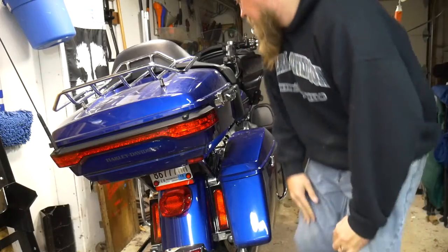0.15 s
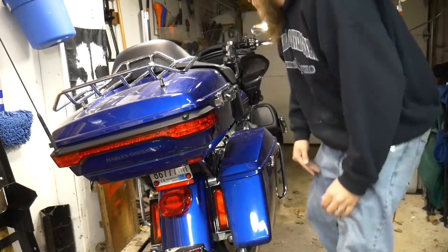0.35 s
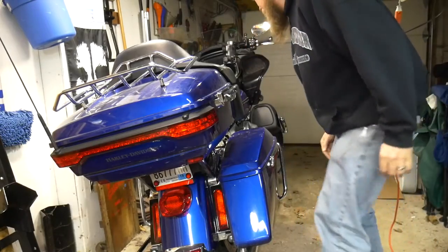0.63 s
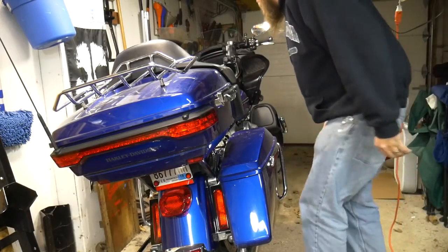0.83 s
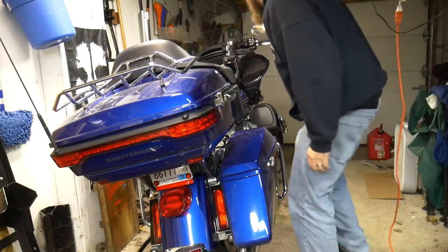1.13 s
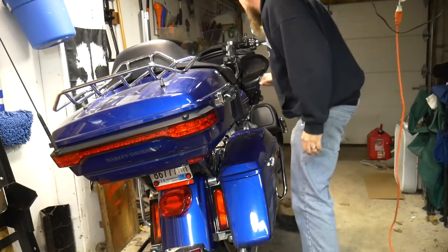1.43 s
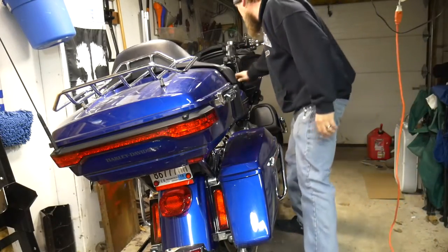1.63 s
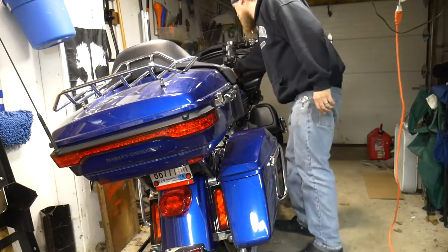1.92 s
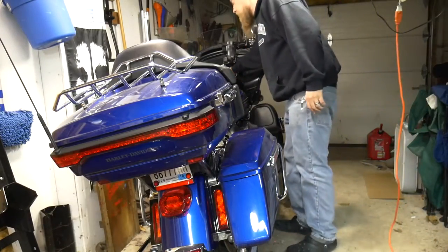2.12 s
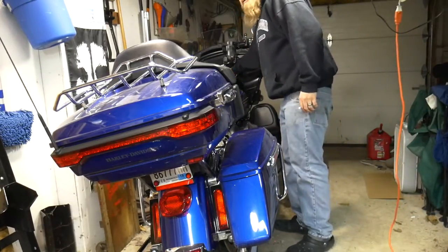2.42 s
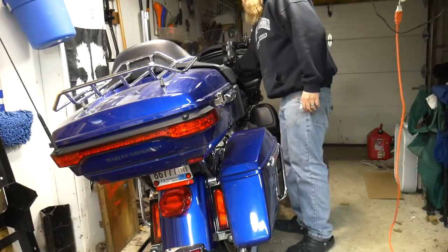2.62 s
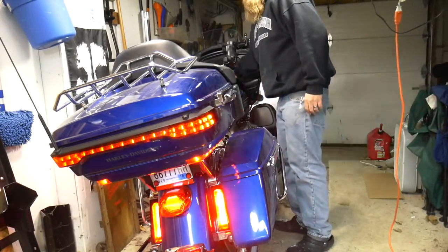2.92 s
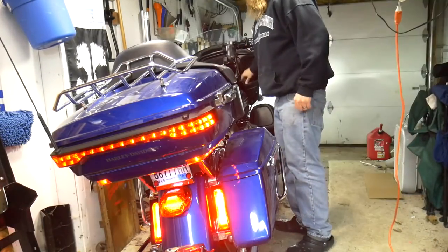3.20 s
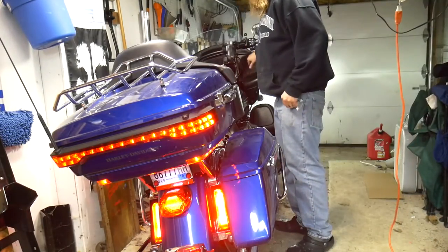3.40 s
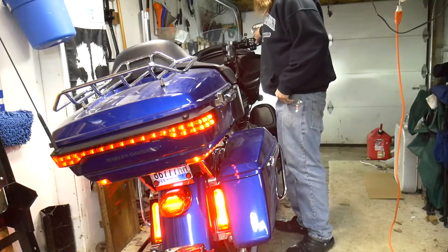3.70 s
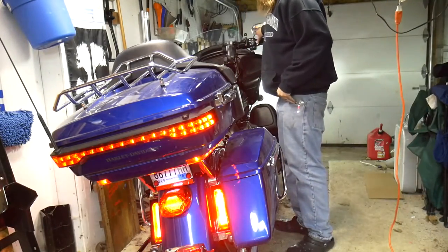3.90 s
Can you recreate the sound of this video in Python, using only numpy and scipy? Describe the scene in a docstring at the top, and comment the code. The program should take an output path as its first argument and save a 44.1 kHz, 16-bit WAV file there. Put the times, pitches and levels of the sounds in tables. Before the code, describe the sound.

After soft shoe scuffs, a sharp switch click and a clack set off a motorcycle fuel pump's electric whine.

```python
"""In a humming garage, a man shuffles up to a motorcycle, his soles grinding grit and his clothes rubbing.
He turns the ignition switch: it snaps sharply and its housing rings. A relay (an electric switch) ticks,
an actuator (a small powered lever) clacks against its stop, and the electric fuel pump fills the line.
Its motor makes a thin, fluttering whine over a low purr, while the fuel hisses past."""
import sys
import numpy as np
from scipy import signal
from scipy.fft import rfft, irfft
from scipy.io import wavfile

SR = 44100
rng = np.random.default_rng(int(sys.argv[2]) if len(sys.argv) > 2 else 0)


def to_wav(sig):
    """Store sig (one row per channel, or 1-D mono) as 16-bit WAV at the path in sys.argv[1].

    Samples outside -1..1 are clipped; the rate is SR.
    """
    pcm = np.clip(np.atleast_2d(sig), -1, 1) * 32767
    pcm = np.round(pcm).astype(np.int16)
    wavfile.write(sys.argv[1], SR, pcm.T)  # frames by channels


N = 178635
TIME = np.arange(N) / SR
PUMP_START_S = 2.97

# tone colour of a small hard tap: f/Hz, level/dB
TICK_SPECTRUM = [(300, -13), (1200, 5.5), (4000, 4), (9000, -8), (15500, -9)]


def ignition_switch(echo_db=7):
    """The switch snaps over its notch in four quick hits, and the parts around it ring."""
    # the hits: t/s, level/dB, time to fade by 60 dB/s
    hits = [(2.6082, -19, .03), (2.6101, -12, 0.028), (2.6118, -13, 0.027), (2.6134, -9.5, 0.018)]
    # tone colour of the snap: f/Hz, level/dB
    spectrum = [(88, -47), (150, -38), (254, -42), (391, -18.5), (466, -25), (600, -22.5), (805, -16.5),
                (905, -14.5), (1040, -11), (1630, -11.5), (1900, -13), (3550, -15), (4950, -19),
                (5360, -18.5), (7000, -21.5), (13200, -32), (16000, -41)]
    # ringing notes of the housing and body panels: f/Hz, level/dB, time to fade by 60 dB/s
    notes = [(412, -38, 0.38), (898, -33, 0.038), (1075, -6.5, 0.034), (1058, -28, 0.14), (1130, -29, 0.39),
             (1334, -28, 0.22), (1360, -47, 1.1), (1472, -30.5, 0.33), (1728, -29, 0.25), (1810, -30, 0.2),
             (1810, -41, 0.98), (1990, -22, 0.09), (2026, -19, 0.11), (3025, -32, 0.15), (3420, -32.5, 0.3),
             (4050, -34, 0.11), (3830, -30, 0.16), (4740, -28, 0.17), (5320, -29.5, .2), (5700, -52, 0.2),
             (7050, -44, .16)]
    snap = blows(hits, spectrum, rise=0.00052)
    # the walls return the whole snap as one sharp click
    click = colour(signal.unit_impulse(N, round(hits[1][0] * SR)), spectrum)
    echo = gain_of(echo_db) * echoes(click, gap=0.008)
    return snap + echo + ring(hits[2][0], notes, rise=0.0012)


def relay():
    """The relay's contacts close with a light, ringing tick."""
    # the contacts meeting: t/s, level/dB, time to fade by 60 dB/s
    hits = [(2.951, -38.5, .03), (2.953, -39.5, .05)]
    # the relay's ringing notes: f/Hz, level/dB, time to fade by 60 dB/s
    notes = [(1230, -38, 0.074), (2110, -39, .06), (2700, -43, 0.054), (4580, -33, 0.05), (7000, -40, .05),
             (9100, -46, .05), (12100, -55, .05), (13500, -45, .05)]
    tick = blows(hits, TICK_SPECTRUM, rise=0.0004)
    return with_echoes(tick, echo_db=1) + ring(hits[1][0], notes, rise=0.0014)


def actuator():
    """The actuator hits its stop, rattles and rings."""
    # hits and rattles: t/s, level/dB, time to fade by 60 dB/s
    hits = [(2.9635, -29.5, 0.033), (2.966, -28, 0.05), (2.9715, -22.5, 0.037), (2.985, -47, .06),
            (3.001, -55, 0.045), (3.012, -47, 0.031)]
    # tone colour of the clack: f/Hz, level/dB
    spectrum = [(120, -53), (200, -32), (347, -11), (623, -17), (777, -13.5), (1000, -18), (1940, -12),
                (2560, -14), (2860, -7), (3070, -13), (3900, -10.5), (4350, -19.5), (5800, -26.5),
                (12800, -40), (16000, -44)]
    # the actuator's ringing notes: f/Hz, level/dB, time to fade by 60 dB/s
    notes = [(794, -36, 0.15), (1437, -38, 0.37), (1925, -29, 0.066), (2880, -14.5, 0.04),
             (3420, -29, 0.076), (3500, -31, 0.12), (3920, -28, 0.093), (4080, -46, 0.086),
             (4990, -39.5, 0.12), (6051, -52, .12), (8700, -51, .12)]
    clack = blows(hits, spectrum, rise=0.00046)
    return with_echoes(clack, echo_db=-3) + ring(hits[1][0], notes, rise=0.00088)


def fuel_pump(swell_s=0.024, cycles_per_turn=36.95):
    """The pump starts with a knock, and its tones and the hiss of fuel swell in."""
    hz, load = motor()
    running = np.clip((TIME - PUMP_START_S) / swell_s, 0, 1)
    phase = 2 * np.pi * np.cumsum(hz) / SR
    shaft_angle = phase / cycles_per_turn
    tones = whine(hz, load, phase, shaft_angle) + purr(shaft_angle) + switching_tone()
    return np.sqrt(2) * running * tones + fuel_hiss(running) + tank_knock()


def motor(start_hz=2066, free_hz=2411, spin_up_s=0.031, load_drop_hz=39, sag_hz_per_s=18):
    """Whine pitch and load (0-1): the motor speeds up, slows as fuel pressure builds, and keeps sagging."""
    age = np.maximum(TIME - PUMP_START_S, 0)
    load = step(3.287, ramp=0.0065)
    run_up = free_hz + (start_hz - free_hz) * np.exp(-age / spin_up_s)
    return run_up - load_drop_hz * load - sag_hz_per_s * age, load


def whine(hz, load, phase, shaft_angle, dead_spot_hz=2365, width_hz=6.6, shimmer_db=0.9):
    """The motor's thin whine, which flutters once with each turn of the shaft."""
    # its tones: multiple of the pitch, level/dB, change under load/dB, change at the dead spot/dB,
    # flutter depth (0-1)
    harmonics = [(1, -46, 0.5, -13, 0.02), (2, -65, 1.5, 8, 0.04), (3, -62, 5, -3.5, 0.36),
                 (4, -65, 5.5, -0.5, .28), (5, -68.5, 1, 0, .5), (6, -64.5, 2, -2, .6)]
    # at one pitch a standing wave (a wave meeting its own echo) weakens the lowest tone, lifts its octave
    dead_spot = np.exp(-((hz - dead_spot_hz) / width_hz) ** 2)
    # uneven turning smears the high tones most
    phase = phase + 0.03 * np.sin(shaft_angle) + 0.05 * drift(70)
    # the lowest tone is weaker until the pump catches fuel
    empty_db = -5 * (1 - step(3.078, ramp=0.0024))
    sound = 0
    for k, db, load_db, spot_db, depth in harmonics:
        flutter = 1 + depth * np.sin(shaft_angle + k + 0.56 * drift(10))
        level_db = db + load_db * load + spot_db * dead_spot + (empty_db if k == 1 else 0)
        sound += gain_of(level_db + shimmer_db * drift(28)) * flutter * np.sin(k * phase)
    return sound


def purr(shaft_angle, waver_db=2.5):
    """The motor spins slightly off balance and purrs in the tank."""
    # tones: cycles per turn of the shaft, level/dB; the last two sit just beside the whine
    tones = [(7, -55.5), (8, -55), (9, -61.5), (13, -73), (17, -70), (36, -72), (38, -61.5)]
    return sum(gain_of(db + waver_db * drift(19)) * np.sin(k * shaft_angle + 0.3 * drift(20))
               for k, db in tones)


def switching_tone(hz=2011):
    """Power switching rapidly on and off sings at a steady pitch."""
    # its tones: multiple of the pitch, level/dB
    harmonics = [(1, -65.5), (2, -73), (3, -65.5), (4, -78)]
    return sum(gain_of(db + drift(11)) * np.sin(2 * np.pi * k * hz * TIME) for k, db in harmonics)


def fuel_hiss(running, flow_db=-51.5):
    """Fuel surges into the empty line and flows on with a steady hiss."""
    # the surges: peak t/s, level/dB, half length/s
    surges = [(3.003, -39.5, 0.031), (3.21, -51, 0.056)]
    # tone colour of flowing fuel: f/Hz, level/dB
    spectrum = [(150, -25), (280, -4.5), (400, 3.5), (560, -7), (700, -12), (1100, -13), (1800, -17),
                (3200, -15.5), (4500, -19), (7000, -19), (10000, -23.5), (15500, -33)]
    flow = np.hypot(running * gain_of(flow_db), humps(surges))
    return colour(grains(spread_db=1) * flow, spectrum)


def tank_knock(wander=0.55):
    """The starting pump jolts the tank, and every jolt swells the same hollow notes."""
    # the jolts: t/s, level/dB, time to fade by 60 dB/s
    jolts = [(2.987, -26.5, 0.062), (3.003, -12.5, 0.024), (3.021, -32, 0.096), (3.035, -31.5, 0.065)]
    # the tank's hollow notes: f/Hz, level/dB
    notes = [(365, -7), (451, 0), (580, -8)]
    tank = sum(gain_of(db) * np.sin(2 * np.pi * hz * TIME + wander * drift(67)) for hz, db in notes)
    return tank * sum(gain_of(db) * dying(s, t60, rise=0.002) for s, db, t60 in jolts)


def shoes(heel_s=0.4172, fade_ratio=0.78):
    """A heel lands, then soles grind over gritty concrete, stopping a little faster than they start."""
    # the slides: peak t/s, level/dB, swell time/s, treble tilt/(dB per octave)
    scuffs = [(.53, -51, 0.1, -2), (.63, -45.5, 0.033, -1.5), (.695, -37, 0.027, -3.5),
              (0.913, -41, 0.016, 0.1), (1.107, -43.5, 0.017, -5.5), (1.495, -47, 0.026, -1.5),
              (1.655, -42, 0.069, 0), (2.119, -48, 0.021, -6), (2.215, -52.5, 0.052, 4),
              (3.83, -51.5, 0.037, -7)]
    # tone colour of grit: f/Hz, level/dB
    spectrum = [(200, -37), (400, -15), (560, -6.5), (800, -6.5), (1200, -2.5), (1700, -6), (2300, -7),
                (2900, -10), (3400, -7), (4300, -18), (8000, -31), (15500, -38)]
    # the heel's short notes: f/Hz, level/dB, time to fade by 60 dB/s
    heel_notes = [(476, -21.5, 0.012), (587, -19, 0.012), (930, -16, 0.013)]
    grit = grains(spread_db=1.5)
    soles = sum(colour(grit * gain_of(db) * stroke(s, swell, fade_ratio * swell), spectrum, tilt)
                for s, db, swell, tilt in scuffs)
    heel = ring(heel_s, heel_notes, rise=0.0012)
    return with_echoes(soles, echo_db=-9) + with_echoes(heel, echo_db=-7.5)


def small_ticks():
    """Small hard things tap together."""
    # the taps: t/s, level/dB, time to fade by 60 dB/s, treble tilt/(dB per octave)
    taps = [(.499, -43, .012, 7), (0.703, -40.5, 0.014, 2.5), (0.885, -38, .022, -3.5),
            (0.91, -38, 0.013, -1.5), (1.021, -42, 0.033, 14), (2.261, -41.5, 0.031, -4),
            (3.942, -39.5, 0.075, -2.5)]
    ticks = sum(blows([(s, db, t60)], TICK_SPECTRUM, tilt) for s, db, t60, tilt in taps)
    return with_echoes(ticks, echo_db=-9)


def clothes(stir_db=-52.5, settle_db_per_s=8, fade_ratio=0.99):
    """Jeans and sweatshirt rub with each move and stir in between, less as the man comes to rest."""
    # the moves: peak t/s, level/dB, swell time/s
    rubs = [(.26, -46.5, 0.12), (.53, -52.5, .06), (.99, -48, 0.076), (1.58, -49.5, 0.059),
            (1.74, -52, 0.057), (2.24, -66, .04)]
    # tone colour of rubbing cloth: f/Hz, level/dB
    spectrum = [(250, -14), (420, -3.5), (600, -4.5), (1000, -2.5), (2200, -5), (3000, -6.5), (3450, -2),
                (4200, -8.5), (8000, -14), (15500, -19)]
    moves = sum(gain_of(db) * stroke(s, swell, fade_ratio * swell) for s, db, swell in rubs)
    rubbing = np.hypot(moves, gain_of(stir_db - settle_db_per_s * TIME))
    return colour(grains(spread_db=1.5) * rubbing * gain_of(drift(8.7)), spectrum)


def trouser_legs():
    """Trouser legs brush past with a short swish."""
    # the swishes: peak t/s, level/dB, half length/s
    swishes = [(0.903, -48, 0.015), (1.447, -36, 0.017)]
    # tone colour of denim: f/Hz, level/dB
    spectrum = [(400, -20), (620, -17), (850, 3.5), (1080, -16), (1350, 1), (1700, -8.5), (2700, -8),
                (3200, -3.5), (4400, -8.5), (7000, -9.5), (12000, -13), (15500, -18)]
    return with_echoes(colour(humps(swishes) * rng.standard_normal(N), spectrum), echo_db=-6.5)


def garage_hum(air_db=-51):
    """Fans and mains power hum and waver over a soft rush of air."""
    # humming tones: f/Hz, level/dB, waver/dB
    tones = [(45.3, -64, -2), (118.4, -57, 1), (139.8, -57, 2.5), (168.5, -68, 5), (258.7, -63.5, 4.5),
             (413.7, -66.5, 4)]
    # tone colour of the air: f/Hz, level/dB
    spectrum = [(18, -37), (42, -21), (65, -11), (90, -10.5), (131, -6.5), (215, -13.5), (259, -5),
                (319, -14.5), (355, -10), (569, -21.5), (616, -21), (760, -25.5), (1010, -21), (2010, -30),
                (2680, -31.5), (16000, -43.5)]
    hum = 0
    for hz, db, waver_db in tones:
        level = gain_of(db + waver_db * drift(4.9))
        wander = hz / 400 * drift(9.6)
        hum += level * np.sin(2 * np.pi * (hz * TIME + rng.random()) + wander)
    return np.sqrt(2) * hum + gain_of(air_db) * colour(rng.standard_normal(N), spectrum)


def echoes(x, gap=0.0033):
    """Walls and clutter return dense echoes after gap seconds; the highest pitches fade first."""
    # how long the garage rings: f/Hz, time to fade by 60 dB/s
    fade_times = [(250, 0.33), (800, 0.38), (2000, 0.3), (5500, .24), (14000, 0.14)]
    count = SR // 2
    signs = rng.choice([-1., 1.], count)
    bounces = signs * (rng.random(count) < 4000 / SR) * (TIME[:count] > gap)  # about 4000 a second
    hz, t, bands = signal.stft(bounces, SR, nperseg=256)
    fade = gain_of(-60 * t / value_at(fade_times, hz)[:, None])
    tail = signal.istft(bands * fade, SR, nperseg=256)[1]
    return signal.oaconvolve(x, tail / np.linalg.norm(tail))[:N]


def with_echoes(x, echo_db):
    """A sound together with its echoes."""
    return x + gain_of(echo_db) * echoes(x)


def blows(hits, spectrum, tilt_db=0, rise=0.00028):
    """Each hit is a short burst of noise in the tone colour of the struck part."""
    force = np.sqrt(sum((gain_of(db) * dying(s, t60, rise)) ** 2 for s, db, t60 in hits))
    return colour(force * rng.choice([-1., 1.], N), spectrum, tilt_db)


def ring(s, notes, rise):
    """A part struck at time s rings with its own notes."""
    return sum(gain_of(db) * dying(s, t60, rise) * np.sin(2 * np.pi * hz * (TIME - s))
               for hz, db, t60 in notes)


def grains(spread_db, per_s=3000):
    """Rubbing noise: many tiny slips of uneven size over a smooth hiss."""
    size = gain_of(spread_db * np.minimum(rng.exponential(1, N), 4))
    slips = rng.standard_normal(N) * size * (rng.random(N) < per_s / SR)
    return evened(evened(slips) + rng.standard_normal(N))


def colour(x, spectrum, tilt_db=0, size=4096):
    """Gives a sound a tone colour, tilted by tilt_db per octave; plain hiss keeps its overall level."""
    hz = abs(np.fft.fftfreq(size, 1 / SR))
    db = value_at(spectrum, hz) + tilt_db * np.log2(np.maximum(hz, 200) / 1000)
    log_gain = np.log(gain_of(np.maximum(db, -100)))
    # this filter rings only after a hit, never before it
    taps = np.fft.ifft(np.exp(signal.hilbert(log_gain).conj())).real[:size // 2]
    return signal.oaconvolve(x, taps / np.linalg.norm(taps))[:N]


def dying(s, t60, rise):
    """A level that rises at time s and falls by 60 dB in t60 seconds."""
    age = np.maximum(TIME - s, 0)
    return (1 - np.exp(-age / rise)) * np.exp(-np.minimum(np.log(1000) * age / t60, 50))


def stroke(s, swell, fade):
    """A level that swells up to time s and fades after it."""
    return np.exp(np.maximum(np.minimum((TIME - s) / swell, (s - TIME) / fade), -30))


def humps(rows):
    """Smooth rounded swells, one for each row."""
    return sum(gain_of(db) * np.exp(-((TIME - s) / half) ** 2) for s, db, half in rows)


def step(s, ramp):
    """A smooth change from 0 to 1 around time s."""
    return 0.5 + 0.5 * np.tanh((TIME - s) / (2 * ramp))


def drift(rate_hz):
    """A slow random wander of typical size 1."""
    hz = np.fft.rfftfreq(N, 1 / SR)
    return evened(irfft(rfft(rng.standard_normal(N)) * np.exp(-(hz / rate_hz) ** 2), N))


def value_at(points, hz):
    """Reads between the rows of a frequency table, giving each octave equal room."""
    f, value = np.transpose(points)
    return np.interp(np.log(hz + 1), np.log(f + 1), value)


def evened(x):
    """Scales a signal to a typical size (rms) of 1."""
    return x / np.sqrt(np.mean(x ** 2) + 1e-20)


def gain_of(db):
    """Turns decibels into a factor."""
    return 10 ** (np.asarray(db) / 20)


def scene(hiss_db=-72, echo_db=-40, hum_db=-36):
    """Two close microphones hear nearly the same; only a trace of echo, hum and hiss differs."""
    # tone colour of the microphones' own hiss: f/Hz, level/dB
    hiss_spectrum = [(40, 22), (300, 9.5), (2000, 4.5), (15500, 5.5)]
    man = shoes() + small_ticks() + clothes() + trouser_legs()
    sounds = man + ignition_switch() + relay() + actuator() + fuel_pump()
    middle = sounds + garage_hum()
    side = gain_of(echo_db) * echoes(sounds) + gain_of(hum_db) * garage_hum()
    side += gain_of(hiss_db) * colour(rng.standard_normal(N), hiss_spectrum)
    return np.array([middle + side, middle - side])


def record(dry, low_hz=38, high_hz=15850):
    """The microphone drops the deepest bass; then the highest treble is cut off."""
    thin = signal.sosfilt(signal.butter(6, low_hz, "highpass", fs=SR, output="sos"), dry)
    treble_cut = signal.firwin(511, high_hz, window=("kaiser", 9), fs=SR)
    return signal.oaconvolve(thin, treble_cut[None], "same")


dry = scene()
out = record(dry)
to_wav(out)
```